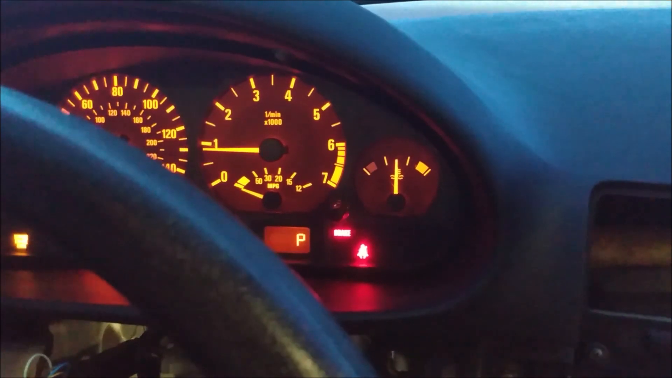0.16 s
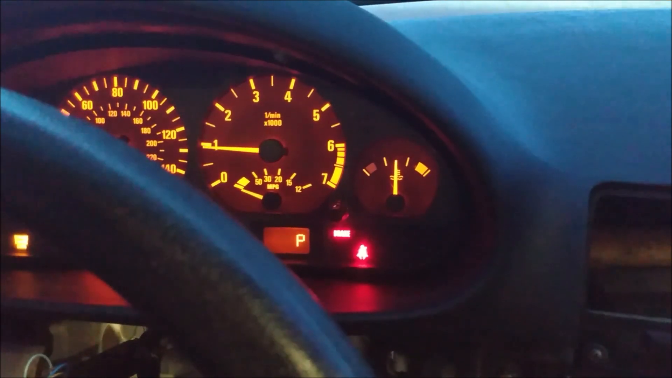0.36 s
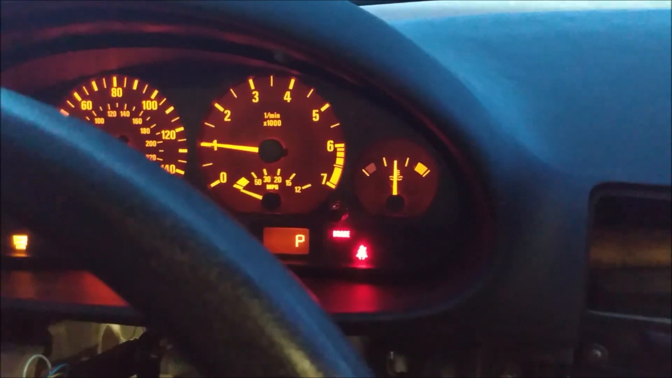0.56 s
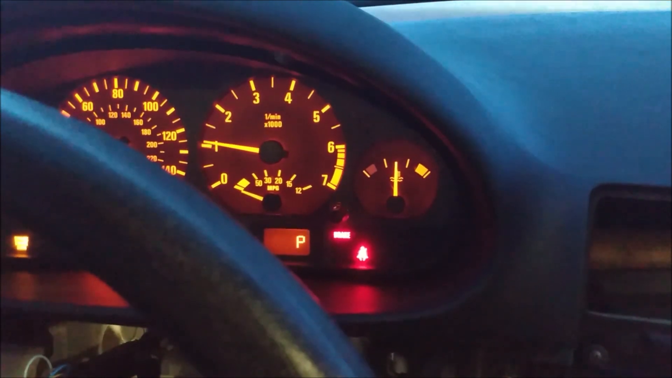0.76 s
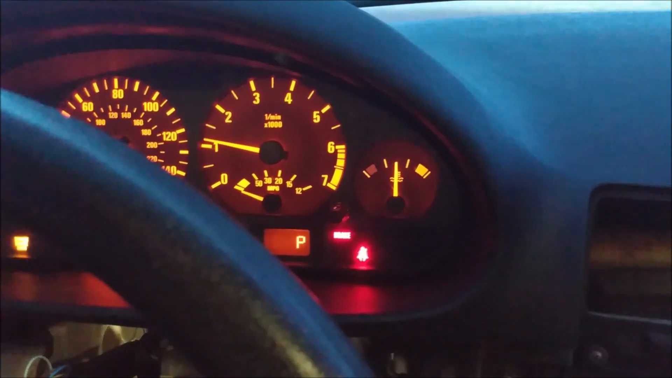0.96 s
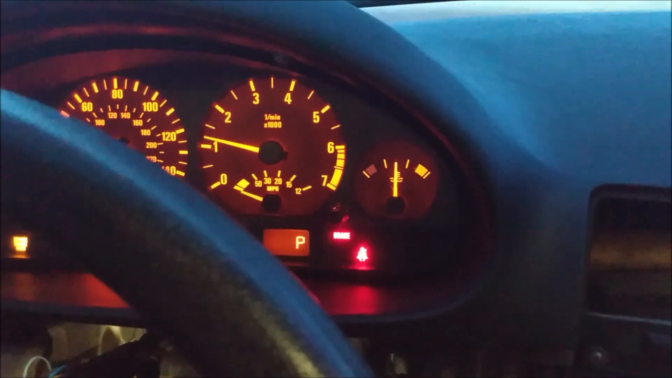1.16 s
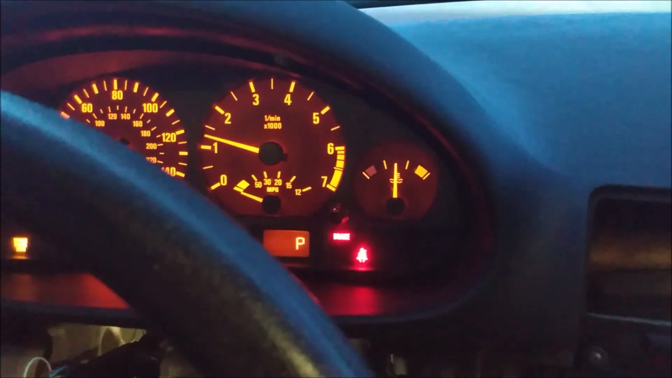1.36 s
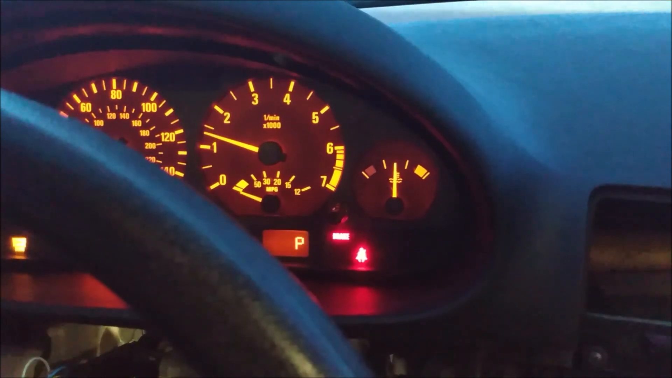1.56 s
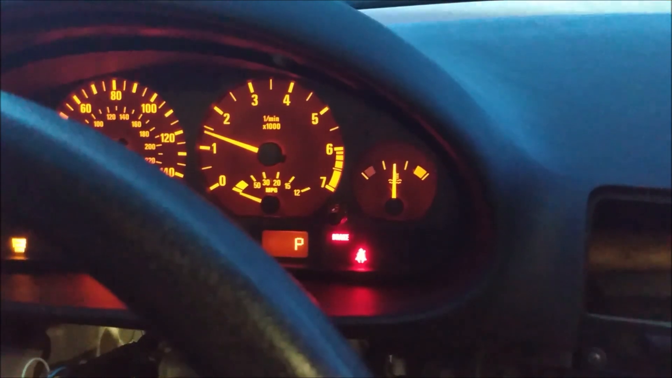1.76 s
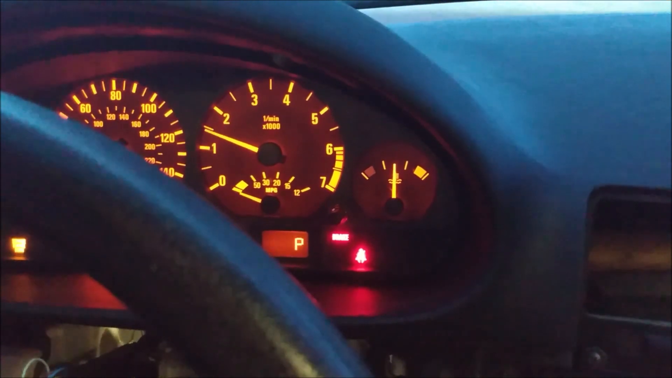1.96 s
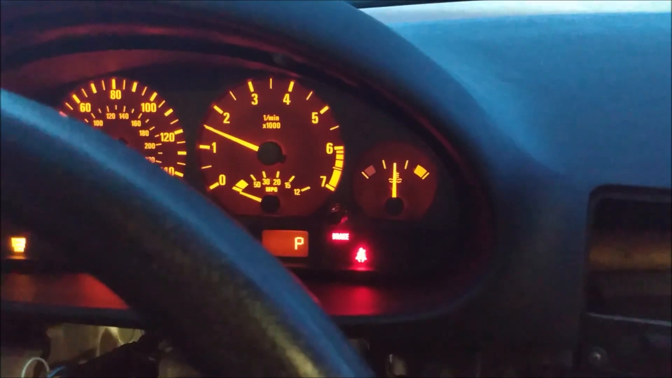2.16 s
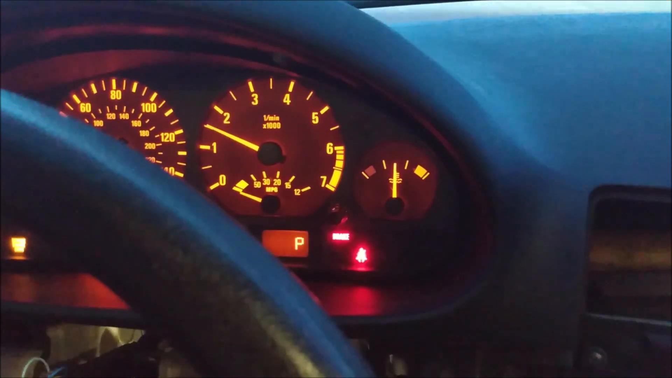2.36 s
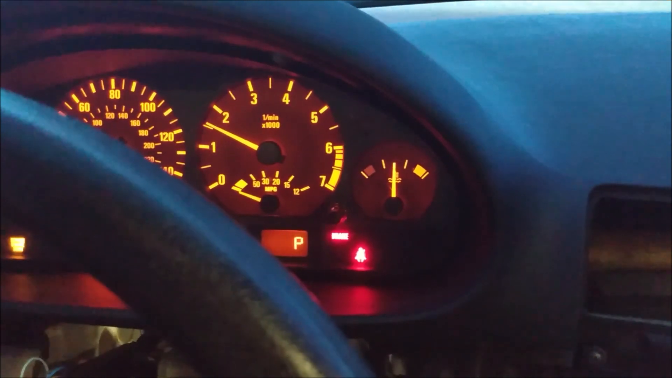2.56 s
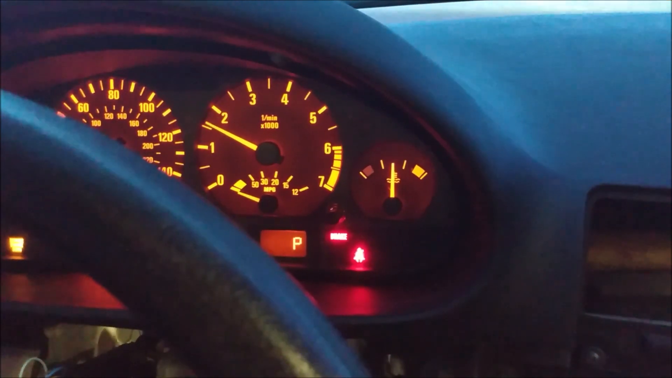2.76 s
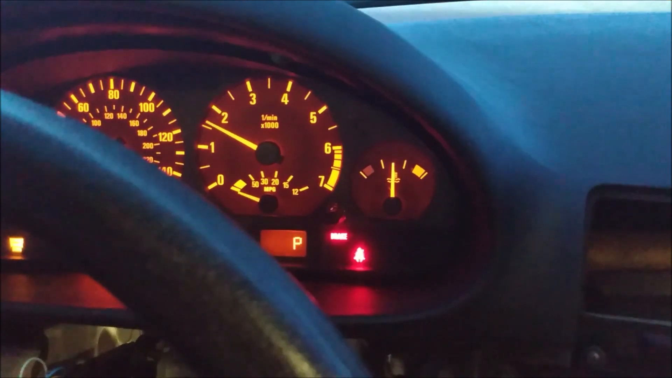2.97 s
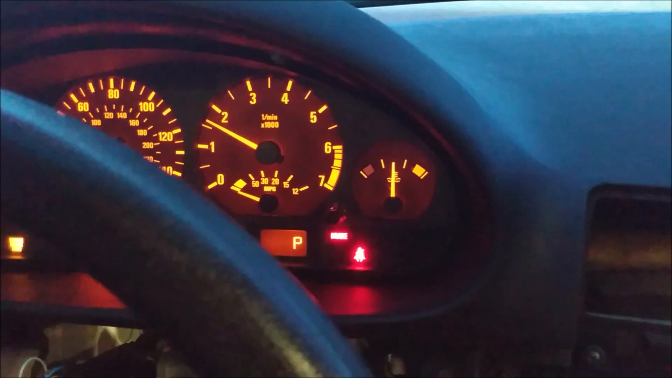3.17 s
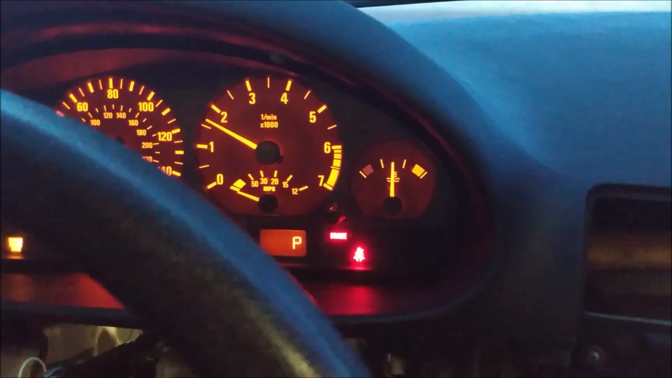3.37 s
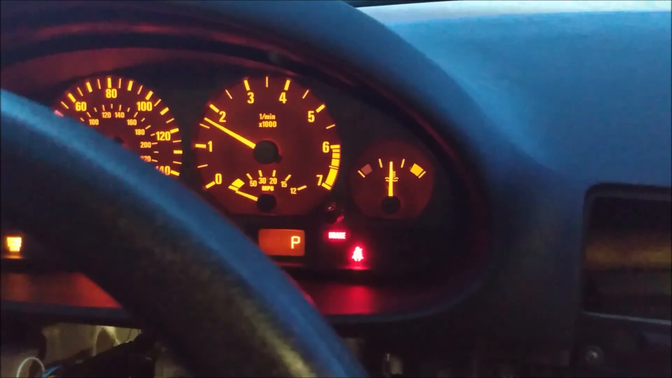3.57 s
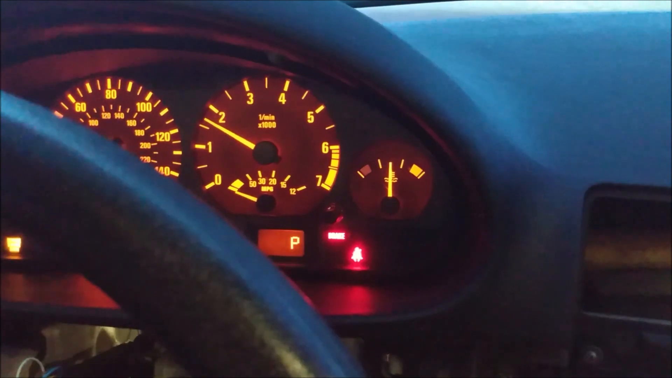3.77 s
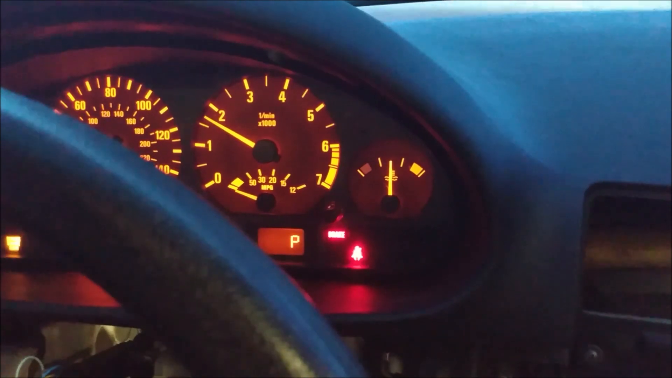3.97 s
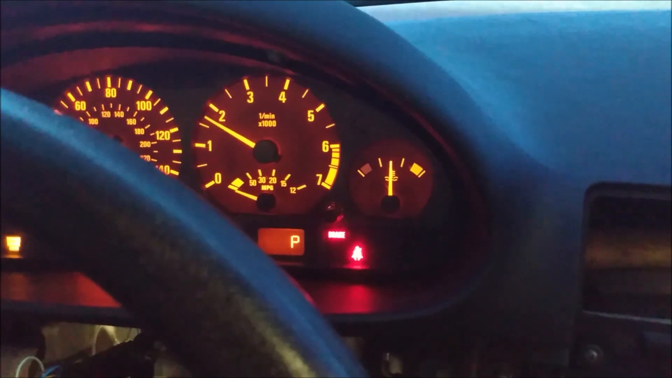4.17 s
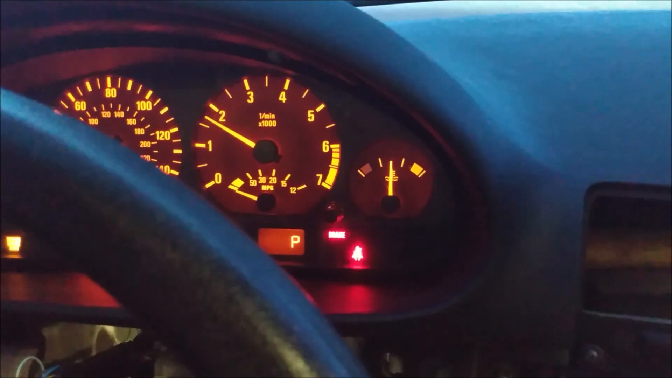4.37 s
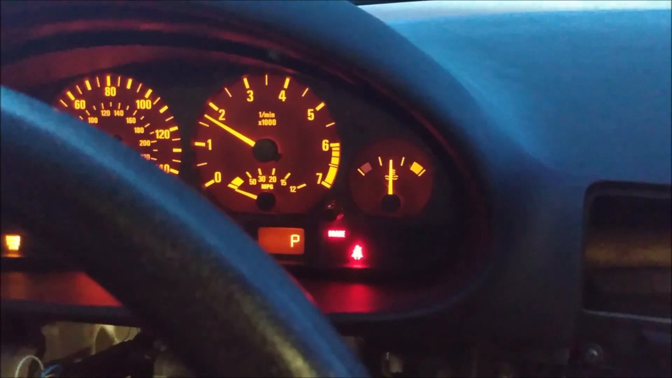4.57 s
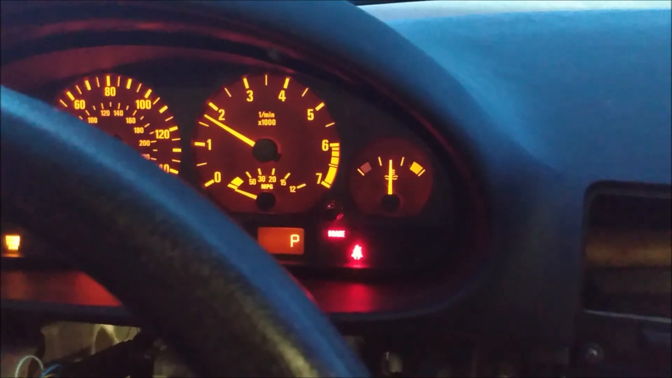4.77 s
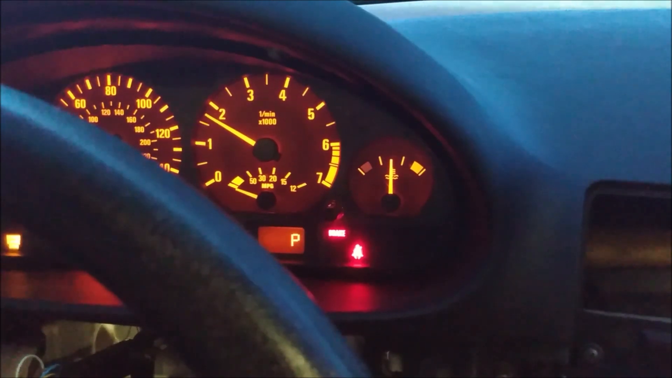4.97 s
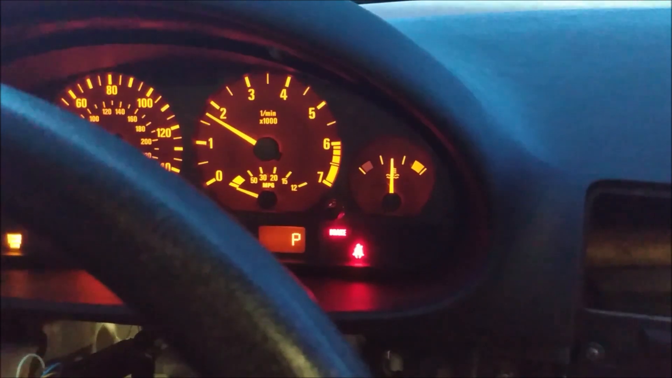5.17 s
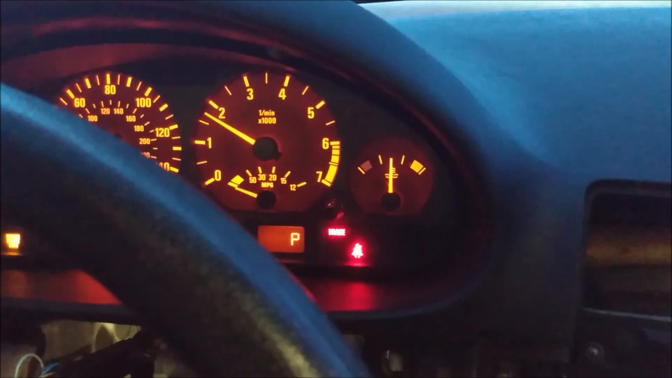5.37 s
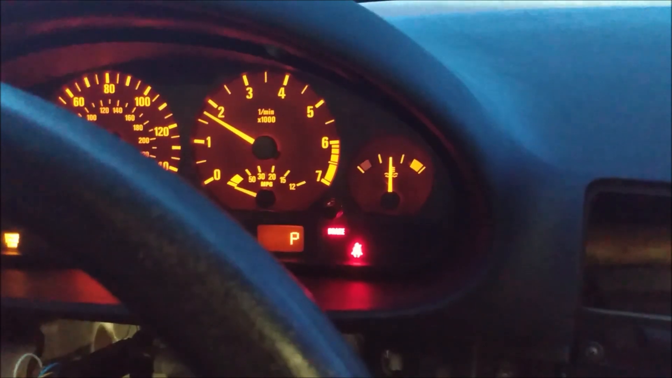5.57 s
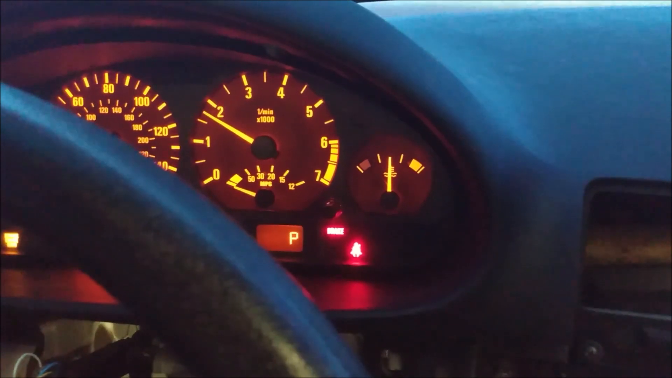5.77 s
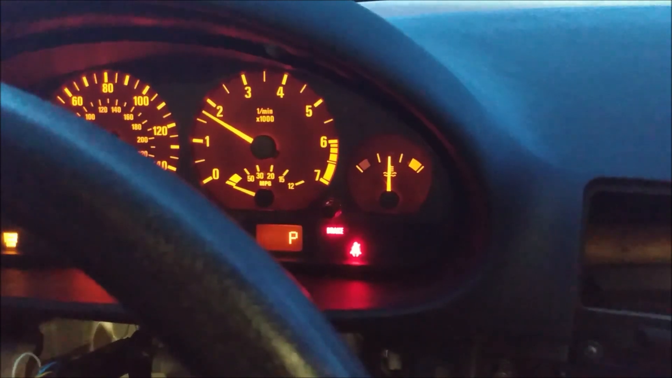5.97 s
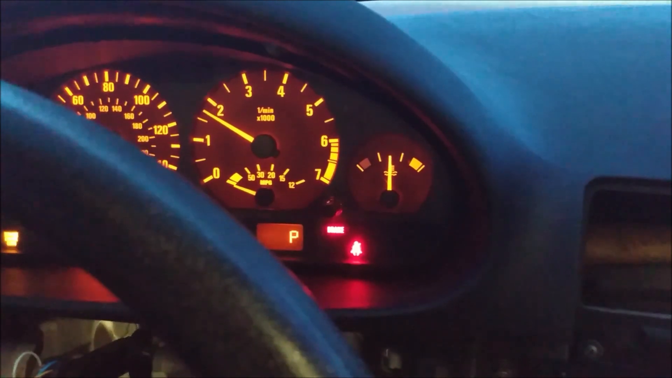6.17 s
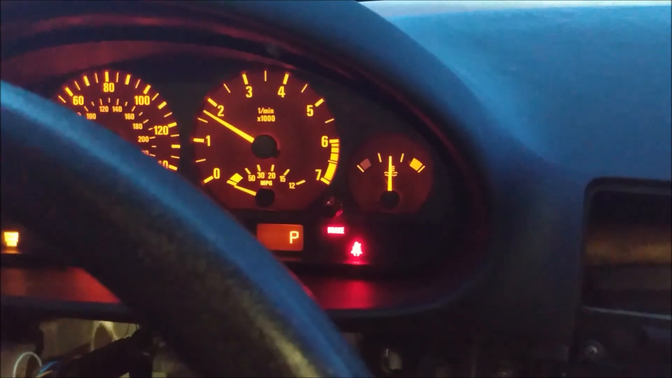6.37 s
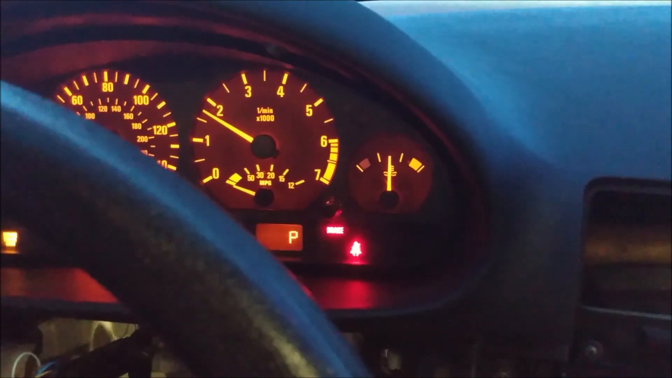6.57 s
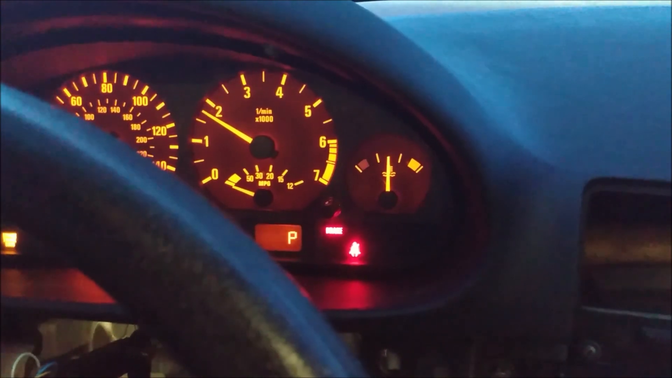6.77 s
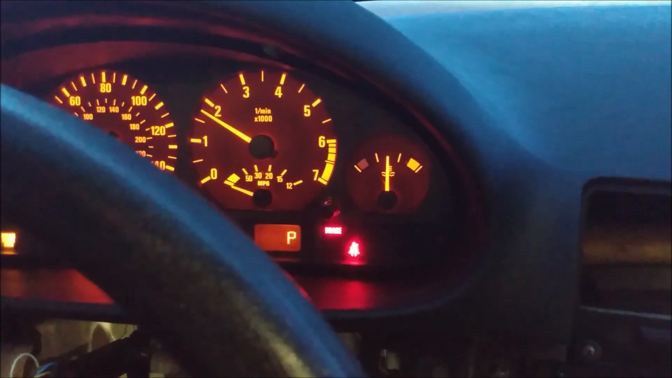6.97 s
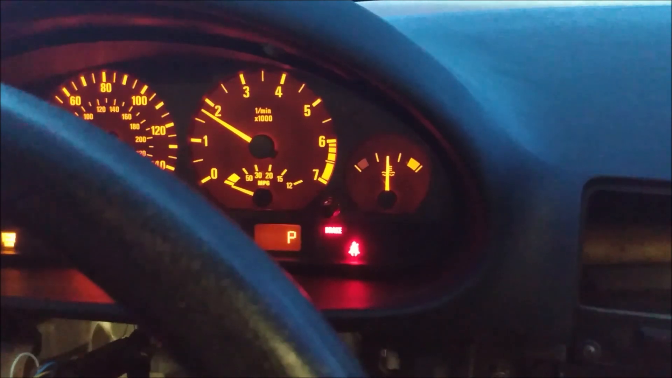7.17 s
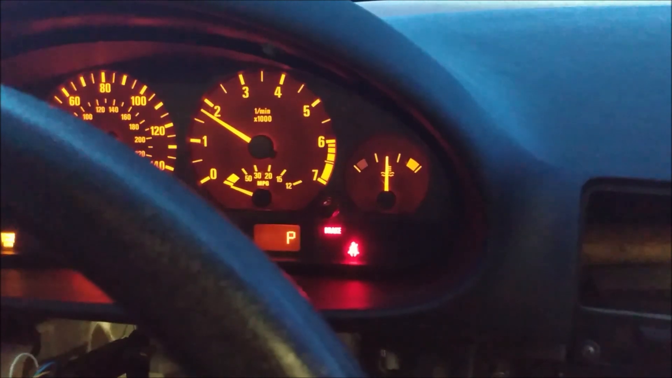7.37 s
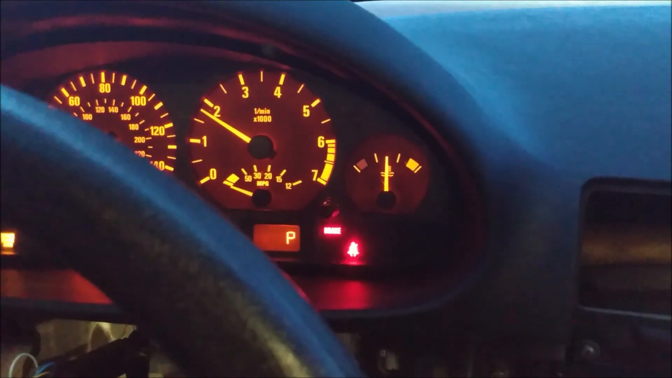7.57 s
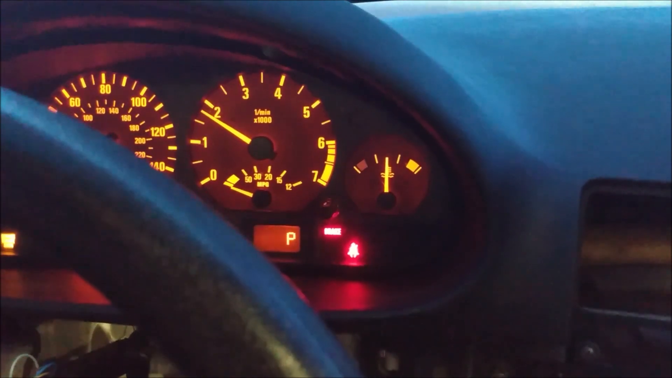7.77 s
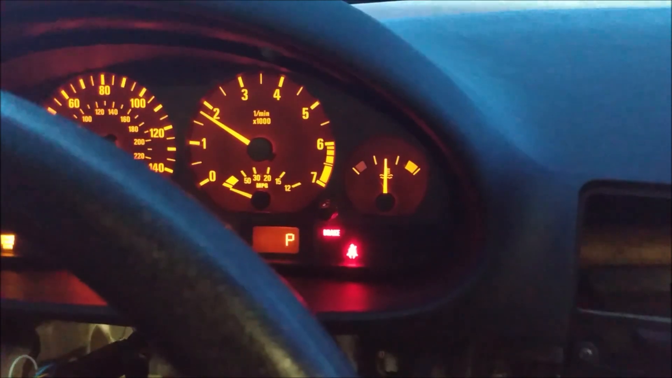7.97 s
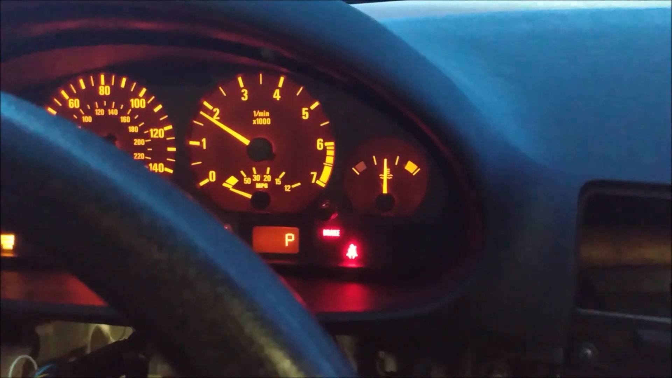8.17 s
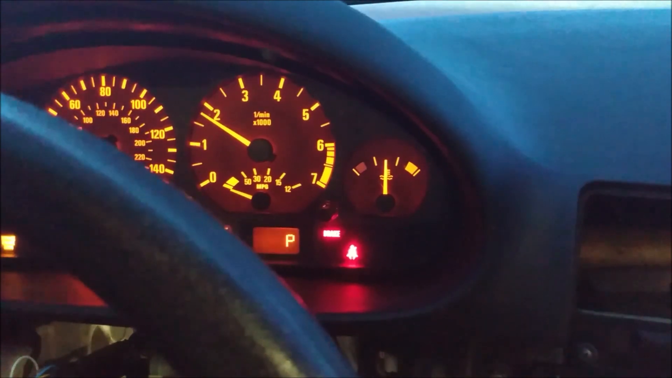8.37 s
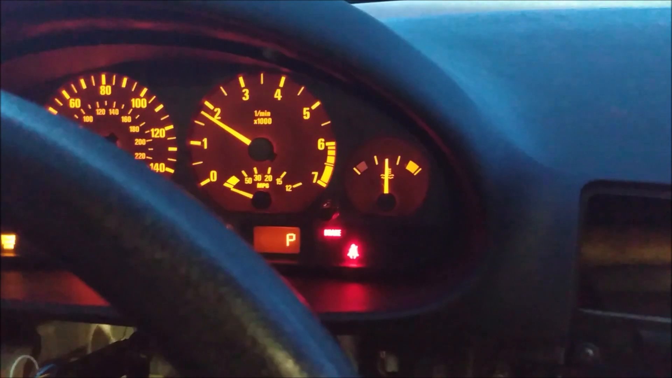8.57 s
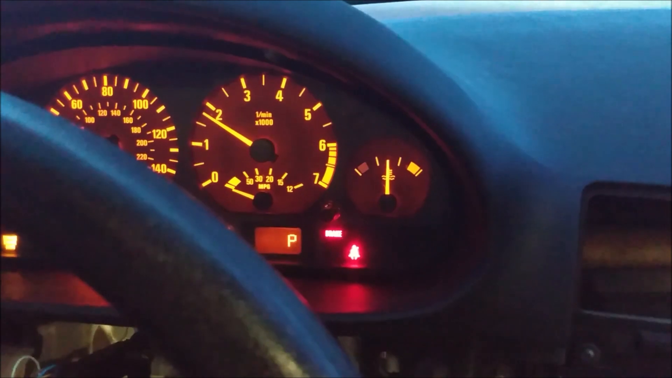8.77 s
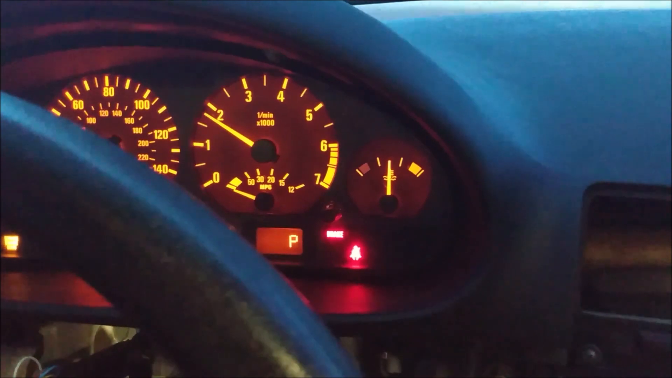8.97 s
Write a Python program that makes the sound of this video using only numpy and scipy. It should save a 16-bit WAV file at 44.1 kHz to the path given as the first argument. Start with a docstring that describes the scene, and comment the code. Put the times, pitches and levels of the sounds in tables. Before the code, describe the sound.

Heard from the driver's seat of a parked car, a warm six-cylinder petrol engine rises from idle, its deep hum gliding upward and booming as it passes cabin and exhaust resonances. It levels off at moderate revs, wavering slightly, with muffled belt and valve whirr, a faint rasp and airy hiss. Near seven seconds the tone hardens with added whine and stays held to the end.

```python
"""A warm six-cylinder petrol engine is eased up from idle to about 1850 rpm and held, in a parked car.
Heard at the driver's seat by two microphones: engine orders, sine tones locked to the crankshaft, glide
through fixed cabin and exhaust resonances, which boom as each one passes; uneven cycles make the bass waver.
Filtered noise and a clatter repeating each cycle make the whirr of valve gear and belts through the bulkhead.
After seven seconds more throttle adds a harder whine; a rasp, hiss, fan rush and small ticks lie around it."""
import sys
import numpy as np
from scipy import signal
from scipy.fft import rfft, irfft
from scipy.io import wavfile

SR = 44100
rng = np.random.default_rng(int(sys.argv[2]) if len(sys.argv) > 2 else 0)


def wav_record(signal):
    """Record a signal, one row per channel, as 16-bit PCM in the file named by sys.argv[1]."""
    frames = np.transpose(np.atleast_2d(signal))
    bounded = np.clip(frames, -1, 1)
    # unit amplitude maps onto the largest positive 16-bit level
    quanta = np.round(bounded * 32767).astype(np.int16)
    wavfile.write(sys.argv[1], SR, quanta)


N = 398223
TIME = np.arange(N) / SR
BINS = np.maximum(np.arange(N // 2 + 1) * SR / N, 1)  # Hz

# crankshaft speed: (time [s], speed [rpm])
CRANK_SPEED = [(0.0, 900), (0.2, 921), (0.42, 994), (0.68, 1137), (1.15, 1273), (1.4, 1368), (2.52, 1655),
               (2.95, 1720), (3.8, 1783), (4.4, 1806), (5.3, 1818), (6.1, 1819), (6.5, 1816), (7.55, 1870),
               (8.5, 1868), (9.03, 1866)]
# throttle opening: (time [s], opening [0-1])
THROTTLE_OPENING = [(0, 0), (6.7, 0.07), (7.15, 0.14), (7.4, 0.87), (9.03, 0.77)]
# how unlike each other the cylinders fire: (time [s], level [dB])
UNEVEN_FIRING = [(0, -4), (1.2, -6), (2.4, 0.5), (3.2, 0), (4, 0), (9.03, 0.5)]
# weaker multiples of the four-stroke cycle rate:
# (order [per cycle], level on light throttle [dB], level on more throttle [dB])
DRONE_ORDERS = [(3, -68.8, -69.7), (4, -72.3, -67.3), (5, -71.3, -67.4), (7, -74.9, -61.9),
                (9, -67.6, -82.5), (10, -73.3, -73), (11, -72.3, -68.9), (13, -68.5, -69.8),
                (14, -66.7, -62.3), (15, -64.8, -71.4), (16, -71.5, -74.0), (17, -67.7, -67.8),
                (19, -74.9, -78.7), (20, -71.3, -81.7), (21, -67.7, -64), (22, -75.5, -69),
                (24, -72.5, -78.3), (27, -80.0, -82.9), (28, -76.8, -82.4), (30, -79.5, -82.2),
                (33, -79.7, -67.9)]
# high orders of valve gear, chain and intake:
# (order [per cycle], level on light throttle [dB], level on more throttle [dB])
WHINE_ORDERS = [(38, -73, -65), (39, -68, -76), (42, -69, -60), (44, -76, -60), (45, -67, -66),
                (46, -70, -76), (51, -70, -58.5), (54, -70, -69), (57, -69, -71), (60, -73, -66),
                (61, -76, -69), (63, -75, -59), (68, -74, -73), (69, -74, -73), (70, -75, -71),
                (72, -73, -54.5), (75, -71, -74), (81, -76, -68), (90, -74, -76), (108, -75, -72)]
# orders of the hum's overtones: (order [per cycle])
HUM_OVERTONE_ORDERS = (12, 18, 36)
# those overtones, in turn: (level at the held speed [dB], added an octave slower [dB],
# added by full throttle [dB], waver [dB])
HUM_OVERTONE_LEVELS = [(-54.5, -1, 1, .3), (-65.2, 4.6, -1, .5), (-67, -1, 6.5, 1.2)]
# resonances of cabin air and body panels: (centre [Hz], width [Hz], gain [dB])
CABIN_MODES = [(44.7, 11.1, 24.9), (60.1, 6.1, 31.2), (87.5, 21.1, 15), (151.5, 11, 28), (159.5, 8, 27),
               (207.3, 23.7, 15.5), (257.9, 16.1, 21.7), (322, 18, 12.5), (392, 19, 20), (470, 55, 11),
               (532.9, 100, 8.6), (685.0, 79.5, 10.2)]
# resonances of the exhaust and its mounts: (centre [Hz], width [Hz], gain [dB])
EXHAUST_MODES = [(46, 2.3, 21), (61, 6.5, 30.5), (63.7, 3.2, 33), (69.5, 6.7, 26), (79.3, 15.4, 23),
                 (85.66, 4, 25.5), (91.6, 7.9, 21)]
# panels that let the whirr through: (centre [Hz], width [Hz], gain [dB])
BULKHEAD_MODES = [(987, 76, 3), (1270, 36, 4), (1511, 24, 9), (2114, 39, 3.5), (2713, 63, 7),
                  (4140, 230, -7)]
# narrow pitches where the firing note and its overtones dip: (centre [Hz], width [Hz], level [dB])
FIRING_DIPS = [(53.3, 1.5, -7), (73.2, 1.2, -6), (86, 0.69, -8.5), (110, 3, -13), (176.1, 8.9, -14)]
# shape of the burning scatter before the cabin: (frequency [Hz], relative density [dB per Hz])
RUMBLE_SPECTRUM = [(15, -17), (30, -19), (60, -4.5), (95, 7), (125, 5), (155, -7), (210, 0.5), (260, -6),
                   (310, -1), (400, -10.5), (600, -5), (1200, -27)]
# shape of the machinery noise before the bulkhead modes: (frequency [Hz], relative density [dB per Hz])
WHIRR_SPECTRUM = [(150, -21), (350, 2), (520, -5.5), (750, -3), (900, -7.5), (1150, -3), (1750, -6.5),
                  (2400, -9.5), (3000, -13), (3500, -18), (4600, -17.5), (6000, -34), (9000, -53)]
# shape of the airy hiss: (frequency [Hz], relative density [dB per Hz])
HISS_SPECTRUM = [(2000, -7.5), (6000, -3), (8000, -8), (9500, -3), (11000, 1), (13500, -5), (15500, -0.5)]
# shape of the fan noise, the same at any engine speed: (frequency [Hz], relative density [dB per Hz])
FAN_SPECTRUM = [(200, -14), (450, -18), (720, 1), (1050, -4.5), (1800, -14), (2600, -8.5), (4200, -15),
                (6000, -28), (10000, -46.5)]
# small noises in the cabin: (time [s], centre [Hz], width [Hz], length [s], level [dB])
CABIN_TICKS = [(.354, 11800, 2600, .002, -51), (2.59, 4200, 4000, .03, -69), (4.28, 5000, 5000, .04, -73),
               (7.21, 4200, 4000, .035, -68)]
# a trim panel sings briefly as an order crosses it: (time [s], order [per cycle], length [s], level [dB])
TRIM_FLARES = [(.8, 36, .2, -59), (1.25, 24, .12, -49), (1.26, 72, .05, -58), (1.6, 110, .1, -61),
               (2.04, 54, .06, -54), (2.85, 28, .16, -55), (2.85, 72, .15, -63.5), (3.55, 27, .22, -59),
               (3.6, 51, .3, -63)]
# likeness of the two microphones: (frequency [Hz], correlation [-1 to 1])
MIC_LIKENESS = [(60, 1), (150, .997), (280, 0.96), (500, 0.8), (1000, 0.36), (2000, -0.08), (12000, -0.12)]
# lean between the microphones: (frequency [Hz], left minus right [dB])
MIC_LEAN = [(60, 1), (250, -1.3), (1000, 0), (2000, -0.5), (4000, 2.5), (8000, 3.5), (12000, -0.3)]

HELD_RPM = 1810  # reference speed for the levels that follow engine speed
# growth for each doubling of speed (dB); rumble and whine take a share of the bay's
BAY_DB_PER_OCTAVE, HISS_DB_PER_OCTAVE = 10.5, 7.5
# hum at the firing rate: level away from any resonance, what full throttle adds (dB), delay (s)
HUM_DB, HUM_THROTTLE_DB, HUM_LAG_S = -57, 6.5, 0.2
# rasp: when the pedal goes down, its rise and its dying back (s)
PEDAL_S, RASP_ATTACK_S, RASP_DECAY_S = .5, 0.059, 2.0
# rasp level at idle, where its dying back starts, and once settled (dB)
RASP_IDLE_DB, RASP_START_DB, RASP_HELD_DB = -77, -65.5, -74.5
TOP_HZ = 15750  # upper limit of the microphones
SIDES = np.array([[1], [-1]])  # left, right


def undb(db):
    """Decibels to gain."""
    return 10 ** (np.asarray(db) / 20)


def curve(table):
    """Value of a (time, value) table at every sample."""
    rows = np.array(table)
    return np.interp(TIME, rows[:, 0], rows[:, 1])


def colour(points, hz):
    """Read a (frequency, value) table on a log-frequency axis."""
    rows = np.array(points)
    return np.interp(np.log(hz), np.log(rows[:, 0]), rows[:, 1])


def colour_gain(points):
    """Gain of a (frequency, dB) spectrum at every frequency bin."""
    return undb(colour(points, BINS))


def resonate(modes, hz):
    """Gain of a direct path plus resonances, added as powers, at the given frequencies."""
    power = 1
    for centre, width, db in modes:
        power = power + (undb(db) / (1 + (2 * (hz - centre) / width) ** 2)) ** 2
    return np.sqrt(power)


def firing_dip_db(hz):
    """How much the firing note dips at a given pitch."""
    return sum(db * np.exp(-((hz - centre) / width) ** 2) for centre, width, db in FIRING_DIPS)


def unit(x):
    """Scale to rms 1."""
    return x / np.sqrt(np.mean(x ** 2))


def walk(rate):
    """Smooth chance with about `rate` turns a second and spread 1."""
    spectrum = rfft(rng.standard_normal(N))
    return unit(irfft(spectrum / (1 + (BINS / rate) ** 4), N))


def diffuse(gain, hz):
    """Random spectra at the two microphones: alike in the bass, nearly unrelated in the treble."""
    mid, side = rng.standard_normal((2, len(hz))) + 1j * rng.standard_normal((2, len(hz)))
    alike = np.clip(colour(MIC_LIKENESS, hz), -1, 1)
    pair = mid * np.sqrt(1 + alike) + SIDES * side * np.sqrt(1 - alike)
    return gain * pair * undb(SIDES * colour(MIC_LEAN, hz) / 2)


def noise(gain):
    """Stereo noise of rms 1 with the given relative gain at each frequency."""
    return unit(irfft(diffuse(gain, BINS), N))


def partial(cycles, cycle_hz, order):
    """An engine order, its microphone phases parting with pitch; their mean is rms 1 before the lean."""
    hz = order * np.median(cycle_hz)
    apart = np.arccos(np.clip(colour(MIC_LIKENESS, hz), 0, 1)) * rng.choice([-1, 1])
    turn = 2 * np.pi * ((order * cycles + rng.random()) % 1)
    phase = (turn + SIDES * apart / 2).astype(np.float32)
    tone = np.sqrt(2) * np.sin(phase) / np.cos(apart / 2)
    return tone * undb(SIDES * colour(MIC_LEAN, hz) / 2)


def firing_note(cycles, cycle_hz, throttle, octaves):
    """Six firings a cycle: the deep hum booms in the exhaust's resonances, its overtones in the cabin's."""
    firing_hz = 6 * cycle_hz
    # the hum swells a moment after the whine
    load = np.interp(TIME - HUM_LAG_S, TIME, throttle)
    hum_db = HUM_DB + HUM_THROTTLE_DB * load + firing_dip_db(firing_hz)
    hum_gain = undb(hum_db) * resonate(EXHAUST_MODES, firing_hz)
    out = hum_gain * partial(cycles, cycle_hz, order=6)
    chance = walk(rate=6.1)
    for order, levels in zip(HUM_OVERTONE_ORDERS, HUM_OVERTONE_LEVELS):
        held_db, slow_db, throttle_db, waver_db = levels
        hz = order * cycle_hz
        # each overtone wavers with its own stretch of the same chance
        waver = waver_db * np.roll(chance, rng.integers(N))
        db = held_db - slow_db * octaves + throttle_db * throttle + waver
        gain = undb(db + firing_dip_db(hz)) * resonate(CABIN_MODES, hz)
        out = out + gain * partial(cycles, cycle_hz, order=order)
    return out


def drone(cycles, cycle_hz, throttle):
    """The weaker orders swell and fade as they cross the cabin's resonances."""
    out = 0
    uneven_db = curve(UNEVEN_FIRING)
    cabin = resonate(CABIN_MODES, BINS)
    waver_db = .7 * walk(rate=4)
    for order, light_db, open_db in DRONE_ORDERS:
        db = light_db + (open_db - light_db) * throttle + np.roll(waver_db, rng.integers(N))
        # each manifold gathers three cylinders; orders between their multiples come from unequal firings
        db = db + uneven_db * (order % 3 > 0)
        gain = undb(db) * np.interp(order * cycle_hz, BINS, cabin)
        out = out + gain * partial(cycles, cycle_hz, order=order)
    return out


def rumble(bay_db, growth=0.32):
    """No two cycles burn alike: the scatter, as noise, keeps the cabin's resonances ringing."""
    scatter = noise(colour_gain(RUMBLE_SPECTRUM) * resonate(CABIN_MODES, BINS))
    return scatter * undb(-44.5 + growth * bay_db)


def valve_clatter(cycles, cycle_hz, count=260, size=8192):
    """A clatter that repeats once a cycle, so its fine lines glide with engine speed."""
    orders = np.arange(count)
    strength = (orders > 22) * np.where(orders % 3, 1, 1.8)  # multiples of three stand out
    lines = diffuse(strength, np.maximum(orders, 1) * np.median(cycle_hz))
    place = cycles % 1 * size
    one_cycle = irfft(lines, size)
    return unit(np.array([np.interp(place, np.arange(size), side, period=size) for side in one_cycle]))


def throb(cycles):
    """Swing of the noise with the cams and the firings."""
    return unit(sum(np.cos(2 * np.pi * (k * cycles + rng.random())) for k in (3, 6, 9, 15)))


def whirr(cycles, cycle_hz, bay_db, throttle, whirr_db=-50, pulsing=0.064,
          intake_db=-58, intake_hz=900, intake_width_hz=900):
    """Belts, fan and valve gear behind the bulkhead; the intake joins in as the throttle opens."""
    wall = colour_gain(WHIRR_SPECTRUM) * resonate(BULKHEAD_MODES, BINS)
    clatter = unit(irfft(rfft(valve_clatter(cycles, cycle_hz)) * wall, N))
    swing = 1 + pulsing * throb(cycles)
    machinery = unit(noise(wall) * swing + .9 * clatter)
    intake = noise(1 / (1 + (2 * (BINS - intake_hz) / intake_width_hz) ** 4)) * swing
    return undb(bay_db + whirr_db) * machinery + undb(intake_db) * throttle * intake


def whine(cycles, cycle_hz, throttle, bay_db, growth=0.99):
    """High orders flare and fade as they glide over the many small modes of the panels."""
    out = 0
    for order, light_db, open_db in WHINE_ORDERS:
        hz = order * cycle_hz
        # a mode every 70 Hz; at the held speed the order stays on one slope of it
        ripple = 1 + .85 * np.sin(2 * np.pi * (hz - np.median(hz)) / 70) * rng.choice([-1, 1])
        light = undb(light_db + growth * bay_db) * ripple
        gain = light * (1 - throttle) + undb(open_db) * throttle
        out = out + gain * partial(cycles, cycle_hz, order=order)
    return out


def fan(fan_db=-61):
    """An even rush of filtered noise under the engine, plainest at idle."""
    return noise(colour_gain(FAN_SPECTRUM)) * undb(fan_db)


def hiss(octaves, hiss_db=-62, flicker_db=0.87, whistle_hz=11849, whistle_db=-88):
    """A thin airy hiss that grows with engine speed, with a faint steady whistle in it."""
    level_db = hiss_db + HISS_DB_PER_OCTAVE * octaves + flicker_db * walk(rate=20)
    air = noise(colour_gain(HISS_SPECTRUM)) * undb(level_db)
    return air + undb(whistle_db) * np.sin(2 * np.pi * whistle_hz * TIME)


def rasp(cycles, ring_hz=2820, width_hz=260, pulsing=0.37):
    """Something near the injectors rings once a firing; it jumps up as the pedal goes down, then settles."""
    ring = noise(1 / (1 + (2 * (BINS - ring_hz) / width_hz) ** 2))
    firings = np.cos(2 * np.pi * 6 * cycles)
    since = np.maximum(TIME - PEDAL_S, 0)
    pressed_db = RASP_HELD_DB + (RASP_START_DB - RASP_HELD_DB) * np.exp(-since / RASP_DECAY_S)
    db = RASP_IDLE_DB + (pressed_db - RASP_IDLE_DB) * np.minimum(since / RASP_ATTACK_S, 1)
    return ring * (1 + pulsing * firings) * undb(db)


def ticks():
    """One tiny bright tick and a few soft rustles, each a brief swell of band noise."""
    out = 0
    for s, hz, width, length, db in CABIN_TICKS:
        band = noise(1 / (1 + (2 * (BINS - hz) / width) ** 2))
        out = out + band * undb(db) * np.exp(-((TIME - s) / length) ** 2)
    return out


def flares(cycles, cycle_hz):
    """Trim panels sing in short swells of single orders during the climb."""
    out = 0
    for s, order, length, db in TRIM_FLARES:
        swell = undb(db) * np.exp(-((TIME - s) / length) ** 2)
        out = out + swell * partial(cycles, cycle_hz, order=order)
    return out


def scene():
    """Engine speed and throttle drive the engine's layers; fan and ticks keep their own time."""
    rpm = curve(CRANK_SPEED)
    # a four-stroke cycle takes two turns, and the crankshaft never turns quite evenly
    cycle_hz = rpm / 120 * (1 + .0007 * walk(rate=6))
    cycles = np.cumsum(cycle_hz) / SR
    throttle = np.clip(curve(THROTTLE_OPENING), 0, 1)
    octaves = np.log2(rpm / HELD_RPM)
    bay_db = BAY_DB_PER_OCTAVE * octaves
    low_tones = firing_note(cycles, cycle_hz, throttle, octaves) + drone(cycles, cycle_hz, throttle)
    high_tones = whine(cycles, cycle_hz, throttle, bay_db) + flares(cycles, cycle_hz)
    machinery = rumble(bay_db) + whirr(cycles, cycle_hz, bay_db, throttle) + rasp(cycles) + fan()
    return low_tones + high_tones + machinery + hiss(octaves) + ticks()


def record(dry):
    """The phone at the seat opens with a 3 ms fade and cuts the top with a steep low-pass."""
    fade = np.minimum(TIME / .003, 1)
    low_pass = signal.ellip(12, .1, 80, TOP_HZ, fs=SR, output="sos")
    return signal.sosfilt(low_pass, dry * fade)


dry = scene()
out = record(dry)
wav_record(out)
```